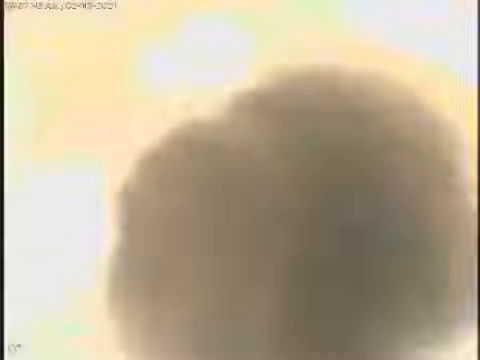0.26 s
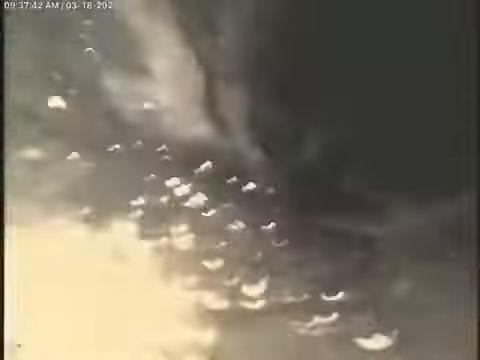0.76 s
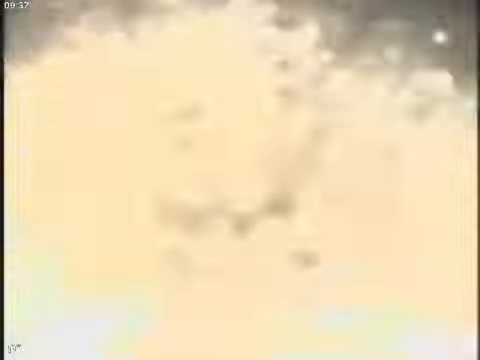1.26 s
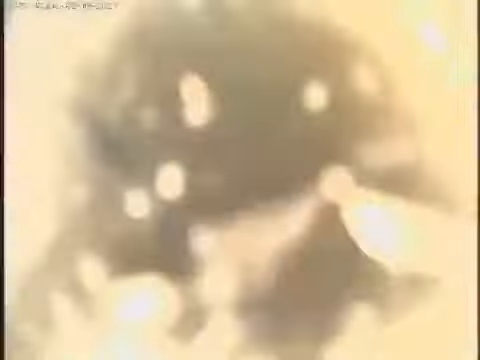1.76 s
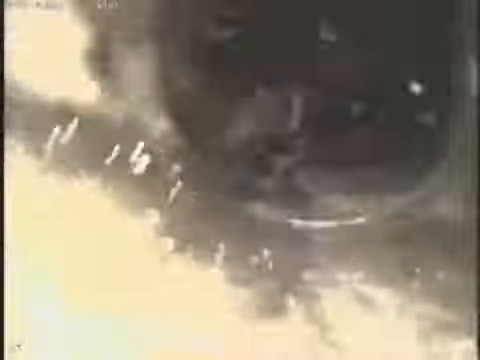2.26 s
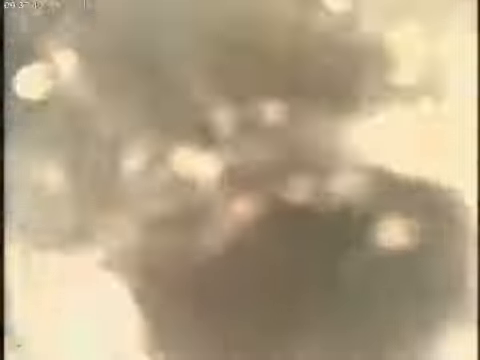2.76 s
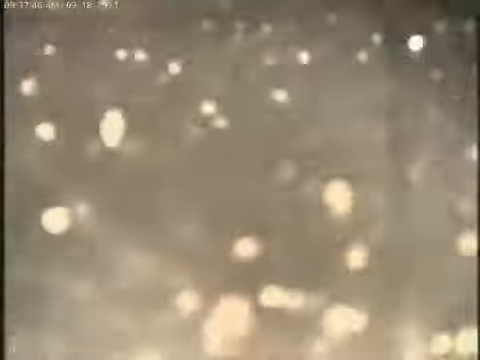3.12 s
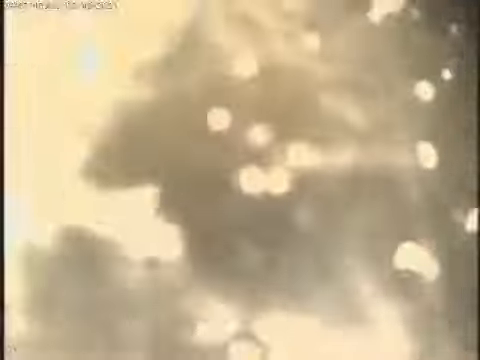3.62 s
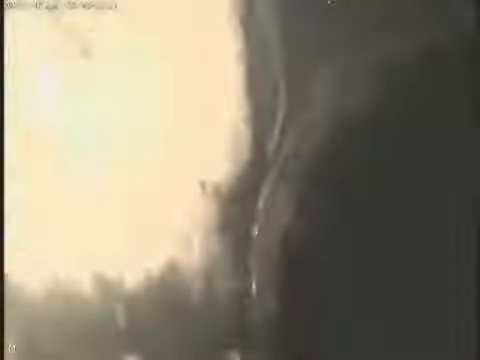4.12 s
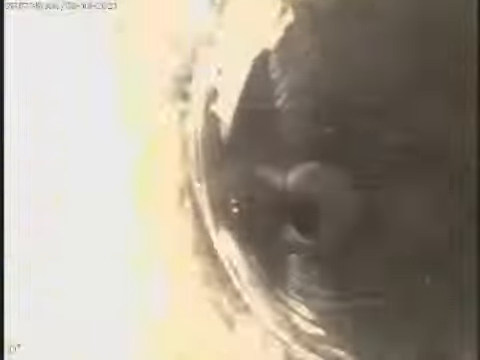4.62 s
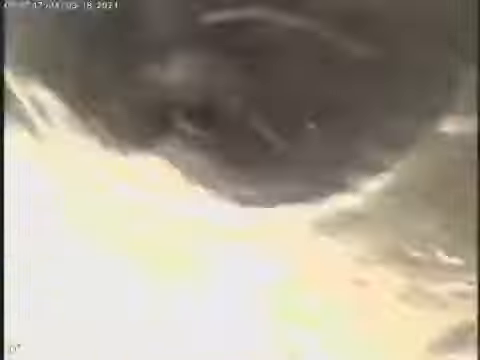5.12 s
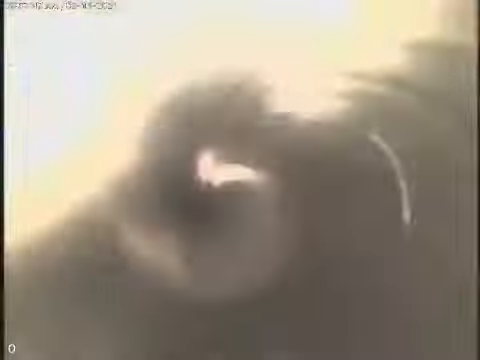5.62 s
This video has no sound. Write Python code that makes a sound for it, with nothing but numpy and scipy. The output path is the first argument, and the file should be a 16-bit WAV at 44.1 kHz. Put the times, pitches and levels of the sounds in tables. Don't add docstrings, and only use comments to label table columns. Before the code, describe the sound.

Outdoors, cable coils scrape and knock at a pipe mouth while a reel drum bumps hollowly, with hard clicks and faint traffic.

```python
import sys
import numpy as np
from scipy import signal
from scipy.io import wavfile

SR = 44100
rng = np.random.default_rng(int(sys.argv[2]) if len(sys.argv) > 2 else 0)


def unload_wav(signal):
    wavfile.write(
        sys.argv[1],
        SR,
        np.round(np.clip(np.atleast_2d(signal).T, -1, 1) * 32767).astype(np.int16),
    )


def convert_level_to_amplitude(level_db):
    exponent = np.asarray(level_db, float) / 20
    return 10 ** exponent


N = 259308

# (time [s], level [dB])
REEL_RUMBLE = [(0.0, -46), (0.3, -39), (0.58, -34.5), (0.71, -37.5), (0.78, -48), (1.43, -49.5),
               (2.0, -45.5), (2.2, -48.5), (2.78, -51.5), (3.05, -37.5), (3.15, -45), (3.3, -33),
               (3.72, -24.5), (3.85, -36), (3.95, -52), (4.72, -73.5), (5.1, -45.5), (5.88, -60.5)]
# (frequency [Hz], level [dB], t60 [s])
FITTING_MODES = [(1646, -0.5, 0.045), (2750, -4.5, 0.059), (4103, -2.5, 0.024), (5560, -16, 0.023)]
SPRING_HZ = 1641
CHANNEL_TOP_HZ = 6830


def rms_one(x):
    return x / np.sqrt(np.mean(x ** 2) + 1e-20)


def peak_one(x):
    return x / abs(x).max()


def band(x, low_hz, high_hz):
    return signal.sosfilt(signal.butter(2, [low_hz, high_hz], "band", fs=SR, output="sos"), x)


def ring(x, hz, t60_s):
    r = convert_level_to_amplitude(-60 / (max(t60_s, 0.002) * SR))
    w = 2 * np.pi * hz / SR
    return signal.lfilter([0, np.sin(w)], [1, -2 * r * np.cos(w), r * r], x + 1e-18)


def resonate(x, hz, width_hz):
    r = np.exp(-np.pi * width_hz / SR)
    zeros = np.array([1, 0, -1]) * (1 - r * r) / 2
    return signal.lfilter(zeros, [1, -2 * r * np.cos(2 * np.pi * hz / SR), r * r], x)


def drift(rate_hz):
    r = np.exp(-80 * np.pi * rate_hz / SR)
    noise = rng.standard_normal(N // 40 + 2002)
    slow = signal.lfilter([1], [1, -2 * r, r * r], noise)[2000:]
    return np.interp(np.arange(N) / 40, np.arange(len(slow)), rms_one(slow))


def grains(per_s, spread_db):
    sizes = convert_level_to_amplitude(spread_db * np.minimum(rng.exponential(1, N), 5))
    signs = rng.choice([-1, 1], N)
    return sizes * signs * (rng.random(N) < per_s / SR)


def in_time(curve):
    s, level_db = np.transpose(curve)
    return np.interp(np.arange(N) / SR, s, level_db)


def arch(start_s, length_s, power):
    phase = np.clip((np.arange(N) / SR - start_s) / length_s, 0, 1)
    return np.abs(np.sin(np.pi * phase)) ** power


def add(track, s, sound):
    i = round(s * SR)
    track[i:i + len(sound)] += sound[:N - i]


def reel():
    # (frequency [Hz], level [dB], t60 [s])
    box_modes = [(176.4, -9.5, 0.12), (206.5, 0, 0.14), (250.6, -4, 0.11), (282, -0.5, 0.089),
                 (329, -11, 0.21), (372, -8, 0.12), (578, -8.5, 0.046), (691, -27.5, 0.025),
                 (1110, -33.5, 0.055)]
    # (time [s], peak [dB], pitch [Hz], decay [s])
    lurches = [(0.186, -21.5, 324, 0.015), (0.346, -14, 232, 0.0054), (0.415, -20, 231, 0.0074),
               (0.449, -15.5, 314, 0.0066), (0.486, -7.5, 216.4, 0.0099), (0.659, -16, 288, 0.01),
               (0.72, -22, 308, 0.013), (1.686, -27.5, 305, 0.022), (1.854, -25.5, 290, 0.0088),
               (1.91, -26, 284, .012), (2.084, -19.5, 248, 0.0062), (1.474, -26.5, 465, 0.0081),
               (2.42, -29.5, 326, 0.017), (2.797, -16, 315, 0.0067), (2.883, -27.5, 268, 0.016),
               (2.904, -20, 307, 0.011), (2.974, -16.5, 322, 0.0096), (2.997, -25, 256, .008),
               (3.030, -10.5, 279, 0.0094), (3.053, -18, 240, 0.0096), (3.078, -14, 302, 0.0076),
               (3.202, -16, 225, 0.0093), (3.233, -15, 202, 0.013), (3.284, -15, 195, 0.012),
               (3.319, -20, 258, .01), (3.341, -17, 189, 0.01), (3.364, -16, 211, 0.025),
               (3.403, -12.5, 209, 0.017), (3.431, -16.5, 202, 0.017), (3.47, -13.5, 202, 0.036),
               (3.511, -7, 274, 0.0093), (3.546, -18, 211, 0.0098), (3.581, -6.5, 229, 0.012),
               (3.631, -5, 215, 0.013), (3.385, -16.5, 318, 0.01), (3.438, -15.5, 333, 0.0074),
               (3.597, -14, 308, 0.0078), (3.66, -20, 260, .01), (3.684, -12, 225, 0.0078),
               (3.704, -8.5, 248, 0.0055), (3.724, -9.5, 201, 0.014), (3.757, -16, 227, .01),
               (3.779, -17, 207, 0.025), (3.823, -19, 213, 0.0092), (3.858, -23, 256, .008),
               (3.88, -25, 350, 0.015), (4.076, -29, 311, 0.014), (5.156, -21.5, 355, 0.011),
               (5.168, -20, 250, 0.0095), (5.281, -31, 348, 0.015),
               (0.289, -31, 260, .006), (0.361, -22, 238, 0.006), (0.522, -18.5, 260, .007),
             (.539, -17.5, 240, 0.0055), (0.574, -20, 250, .007), (.588, -22, 279, .007),
             (.603, -18.5, 297, .006), (.695, -20, 320, 0.0076), (1.475, -32.5, 330, 0.0076),
             (1.64, -29, 420, 0.0055), (1.825, -29.5, 270, .008), (2.045, -30.5, 304, .01),
             (2.14, -31, 258, 0.0072), (5.162, -19.5, 400, 0.0067), (5.184, -26, 380, 0.0061),
             (5.284, -23.5, 404, 0.0043)]
    rumble = np.zeros(N)
    for hz, db, t60_s in box_modes:
        rumble += convert_level_to_amplitude(db + 2.0 * drift(22)) * ring(grains(90, 0.52), hz, t60_s)
    out = convert_level_to_amplitude(in_time(REEL_RUMBLE)) * rms_one(band(rumble, 140, 810))
    t = np.arange(SR // 8) / SR
    for s, peak_db, hz, decay_s in lurches:
        swell = (1 - np.exp(-t / 0.0022)) * np.exp(-t / decay_s)
        tone = np.sin(2 * np.pi * hz * t) + 0.09 * np.sin(2.7 * np.pi * hz * t)
        add(out, s, convert_level_to_amplitude(peak_db - 3.5) * swell * tone)
    return out


def effort():
    # (time [s], length [s], sheath level [dB], wall share [dB], grit share [dB])
    jerks = [(0.145, 0.088, -50, 9.5, -2), (0.338, 0.16, -49, -5, -7), (0.509, 0.18, -52, 5.5, 3.5),
             (0.701, 0.05, -51, 2, -1.5), (0.895, 0.18, -49.5, -3, -5), (2.013, 0.042, -60, 8.5, 1),
             (2.069, 0.23, -53.5, 0, -6), (2.429, 0.5, -59, -10, 17), (2.793, 0.008, -48, 6, 10),
             (2.959, 0.036, -52, 7, -10), (3.017, 0.03, -47, 8, -10), (3.775, 0.18, -45.5, 2, 1),
             (4.058, .006, -39, -3, -7), (4.079, 0.18, -46.5, -7.5, 1.5), (4.938, 0.127, -49.5, -7, -1.5),
             (5.01, 0.12, -43.5, -1.5, -0.5), (5.149, 0.015, -40.5, 7.5, -18),
             (5.277, 0.033, -40, 1.5, -26), (5.337, 0.065, -39, 1, -5), (5.412, 0.2, -37, -1, -4),
             (5.167, 0.021, -49, 4, -9), (0.698, 0.0099, -49, 0, 8), (5.773, 0.11, -47.5, -7.5, -8)]
    # (time [s], length [s], sheath level [dB], wall share [dB], grit share [dB])
    pushes = [(0, 0.23, -59.5, 11.5, -12), (1.01, 0.3, -56, 3.5, -1), (1.276, 0.2, -55, -21, -4),
              (0.24, 0.13, -53, 1, -0.5), (1.475, 0.26, -53, 2.5, -1), (1.579, 0.38, -47.5, -1.5, -3),
              (2.565, 0.24, -50, -12, 8), (4.098, 0.3, -59.5, 10.5, 4), (2.26, 0.29, -62.5, 0, -1),
              (2.887, 0.052, -50.5, 7.5, -15), (3.112, 0.93, -44.5, 3, -1), (3.95, 0.14, -51, -5, -1),
              (4.309, 0.27, -48, -5, -5), (4.445, 0.36, -57, -12, 6), (4.756, 0.13, -56, -21, 3),
              (4.877, 0.076, -61, -16, 5), (5.58, 0.17, -40, -9, -0.5), (2.78, 0.092, -55.5, -10, 11),
              (3.064, 0.29, -61, 9, 7.5), (5.172, 0.13, -67, 7.5, 2), (5.688, 0.089, -59.5, -8, 6)]
    attack_s, sag_db_per_s, release_s = 0.0078, 15, 0.017
    drag_db = np.array([-85.5, -59, -87.5])
    idle_db, drag_follows = -54.5, 0.36
    t = np.arange(N) / SR
    power = convert_level_to_amplitude(drag_db[:, None] + drag_follows * (in_time(REEL_RUMBLE) - idle_db)) ** 2
    for s, length_s, db, wall_db, grit_db in jerks:
        u = np.maximum(t - s, 0)
        release = np.exp(-(np.maximum(u - length_s, 0) / release_s) ** 2)
        shape = (1 - np.exp(-u / attack_s)) * convert_level_to_amplitude(-sag_db_per_s * u) * release
        power += np.outer(convert_level_to_amplitude(db + np.array([0, wall_db, grit_db])), shape) ** 2
    for s, length_s, db, wall_db, grit_db in pushes:
        shape = arch(s, length_s, 1.79)
        power += np.outer(convert_level_to_amplitude(db + np.array([0, wall_db, grit_db])), shape) ** 2
    return np.sqrt(power)


def scrape():
    # (frequency [Hz], width [Hz], level [dB])
    sheath = [(2020, 450, -3), (2670, 530, 5.5), (3600, 900, -3.5), (3425, 140, 4), (3860, 390, 3)]
    # (frequency [Hz], width [Hz], level [dB])
    wall = [(680, 320, 6.5), (696, 53, 6), (940, 72, -15), (1176, 365, 4.5), (1640, 86, -2)]
    # (frequency [Hz], width [Hz], level [dB])
    grit = [(4500, 1300, 3), (5740, 220, 2), (8000, 6900, 2.5)]
    clumps = convert_level_to_amplitude(1.8 * drift(29) + 0.3 * drift(79))
    rubbing = rms_one(grains(5000, 0.72)) + 0.83 * rng.standard_normal(N)
    out = np.zeros(N)
    for body, gain in zip((sheath, wall, grit), effort()):
        voiced = np.zeros(N)
        for k, (hz, width_hz, db) in enumerate(body):
            own_spot = np.roll(rubbing, 977 * k)
            voiced += convert_level_to_amplitude(db + 2.6 * drift(5)) * resonate(own_spot, hz, width_hz)
        out += gain * rms_one(voiced * clumps)
    return out


def knocks():
    # (frequency [Hz], level [dB], t60 [s])
    frame_modes = [(555, -14.5, 0.023), (706, -4, 0.042), (940, -22, 0.033), (1270, 0, 0.0077),
                   (1300, -13, 0.011), (1600, -20.5, 0.0095)]
    # (frequency [Hz], level [dB], t60 [s])
    coil_modes = [(2330, -4, .018), (2620, -6, .014), (3000, -6, .012), (3250, -3, .018), (3670, 0, .014),
                  (4170, -4, .018), (4700, -10, .01), (5500, -10, .01), (6200, -8, .011)]
    # (time [s], peak [dB], ring [Hz], frame share [dB], coil share [dB])
    dry_blows = [(0.026, -29.5, 4000, -4.5, -17), (0.174, -27, 705, 4, -35), (0.338, -25.5, 4250, -9, 2.5),
                 (0.486, -23.5, 577, 2, -28), (0.604, -31, 616, 1, 9), (1.095, -39, 1640, -5, -3),
                 (1.358, -31, 527, -8, -27), (2.021, -36, 640, -12, 8), (2.194, -24.5, 1600, -5, -3.5),
                 (2.791, -15, 4400, -7, -7), (2.936, -25, 1640, -5, -8), (3.073, -21, 1150, 4, -10),
                 (3.501, -23.5, 1020, -16, 2.5), (3.693, -18, 2600, -7, -6), (3.724, -25, 4630, -29, 3.5),
                 (3.788, -25.5, 4870, -12, 4), (3.81, -30, 1190, 7.5, -7), (5.021, -12, 3940, -27, -2.5),
                 (5.285, -21, 850, 13, 8.5), (5.364, -16.5, 660, -30, -21), (5.594, -29, 696, -27, 4),
                 (5.674, -24, 2320, -8, -20), (5.877, -24, 2080, -8.5, -2.5)]
    # (time [s], peak [dB], ring [Hz], frame share [dB], coil share [dB])
    damped_blows = [(0.159, -27, 1240, -3, -12), (0.198, -33, 1323, -18, 5.5), (0.222, -33, 600, -29, 1),
                    (0.656, -26, 736, -9, -6), (0.685, -38, 710, -7, 10), (0.881, -14, 3050, -18, -11.5),
                    (2.42, -27, 1520, -3, -3), (3.076, -27, 580, 5, -44), (3.023, -17.5, 1270, -20, -3.5),
                    (3.028, -13.5, 1430, -4, -20), (4.068, -7, 3950, -15.5, -1.5),
                    (4.223, -36, 1090, 7, -8), (4.254, -27, 644, -2.5, -16), (4.476, -32.5, 716, -5.5, -16),
                    (5.297, -22, 700, -22, -2), (0.438, -26.5, 1360, -11, -16), (4.16, -29, 706, -10, -32),
                    (4.293, -31, 696, -7, -17), (5.336, -16.5, 706, -8, -13), (5.415, -22, 754, -1, 9),
                    (5.507, -19, 670, -15, 0.5), (5.578, -20, 750, -11, -5)]
    # (time [s], peak [dB], ring [Hz], frame share [dB], coil share [dB])
    loose_blows = [(0.373, -24, 3060, -40, -5), (0.72, -25, 1070, -5, -6), (1.474, -20, 700, -10, -17),
                   (2.479, -25, 1220, -28, -30), (2.97, -30.5, 680, 5, -8.5), (3.089, -13, 640, -11, -28),
                   (4.081, -20, 4370, -24, 4), (5.149, -14, 2880, -31, -0.5), (5.156, -37, 686, 14.5, -14),
                   (5.163, -11.5, 692, -3, -20), (5.453, -21, 680, -37, -5), (5.775, -24, 3050, -6, 3.5),
                   (5.813, -25, 2430, -36, -27)]
    out, t = np.zeros(N), np.arange(SR // 7) / SR

    def struck(shove, modes):
        return sum(convert_level_to_amplitude(db + 3 * rng.standard_normal()) * ring(shove, hz, t60_s) for hz, db, t60_s in modes)

    for blows, rattle_db in ((dry_blows, -16), (damped_blows, -8), (loose_blows, 7)):
        for s, peak_db, hz, frame_db, coil_db in blows:
            chatter = np.exp(-t / 0.002) + convert_level_to_amplitude(rattle_db) * np.exp(-t / 0.013)
            shove = rng.standard_normal(len(t)) * chatter + 7.4 * (t == 0)
            low_crack = band(band(shove, 430, 2300), 430, 2300)
            high_crack = band(band(shove, 1500, 9200), 2200, 9800)
            low = peak_one(band(struck(shove, frame_modes), 220, 1900)) + 1.27 * peak_one(low_crack)
            high = peak_one(band(struck(shove, coil_modes), 2400, 8700)) + 1.26 * peak_one(high_crack)
            own = peak_one(band(ring(shove, hz, 0.004 + 11.0 / hz), 0.7 * hz, 1.4 * hz))
            blow = 0.56 * own + convert_level_to_amplitude(frame_db) * low + convert_level_to_amplitude(coil_db) * high
            add(out, s - 0.0004, convert_level_to_amplitude(peak_db - 6.5) * blow)
    return out


def clacks():
    # (frequency [Hz], level [dB], t60 [s]))
    hard_blows = [
        (3.0730, 0.00032, -5, [(570, 2, 0.039), (714, -3, 0.053), (887, -2.5, 0.042), (1180, 2.5, 0.034), (1585, -9.5, 0.038), (2700, -15, 0.039), (3070, -10.5, 0.023), (3860, -19, 0.02), (5680, -18, 0.013)]),
        (4.0675, 0.00077, -5, [(690, -27, 0.076), (2324, -4, 0.028), (3040, -8, 0.027), (3370, -5, 0.026), (3676, 7.5, 0.012), (4100, -13, 0.022), (4690, -14.5, .03), (4940, -17, 0.034), (5760, -13, .03), (6250, -3, 0.02)]),
        (5.1484, 0.0003, -15.5, [(2580, 3.5, 0.036), (3370, -9, .025), (3960, 0, 0.028), (6420, 3, 0.016)]),
        (5.2824, 0.0012, -10.5, [(675, 8.5, 0.026), (1073, 1, 0.017), (1310, -5, .02), (2200, -8, 0.018), (2620, -5, 0.041), (3050, -7, .02), (3540, -1.5, 0.037), (3840, -1.5, 0.024), (5600, -29, 0.018)]),
        (.1585, 0.00055, -18.5, [(540, -2.5, 0.023), (705, -3, .035), (960, -5, 0.023), (1200, 1.5, 0.019), (1520, -11, .025)]),
    ]
    out, t = np.zeros(N), np.arange(SR // 8) / SR
    for s, rise_s, peak_db, modes in hard_blows:
        sound = np.zeros(len(t))
        for k, (hz, db, t60_s) in enumerate(modes):
            sound += ring(convert_level_to_amplitude(db) * (-1) ** k * (t == 0), hz, t60_s)
        splinter = np.exp(-t / 0.00064) + convert_level_to_amplitude(-17.5) * np.exp(-t / 0.015)
        crack = band(rng.standard_normal(len(t)) * splinter, 2000, 4800)
        rise = 1 - np.exp(-(t / rise_s) ** 2)
        blow = peak_one(sound * rise) + convert_level_to_amplitude(-11.5) * peak_one(crack * np.sqrt(rise))
        add(out, s, convert_level_to_amplitude(peak_db) * blow)
    return out


def slips():
    # (time [s], peak [dB], ring [Hz])
    slip_events = [(.107, -41, 3500), (.2, -27.5, 5930), (0.22, -31, 5030), (3.047, -32.5, 2700),
                   (3.617, -28.5, 1900), (3.9, -29, 2500), (5.033, -28, 3000), (5.04, -31, 4500),
                   (5.293, -23, 3300), (5.302, -26, 2200), (.373, -24.5, 3000), (.175, -29, 1300),
                   (.236, -34, 2300), (5.776, -30, 6500), (5.81, -45, 1110), (5.358, -33, 1000),
                   (5.368, -25, 2570), (5.38, -33, 744), (5.398, -29, 686), (5.405, -24, 740),
                   (5.436, -32, 720), (5.456, -26, 3300), (5.491, -33, 2700), (5.511, -24, 2700),
                   (5.53, -33, 3620), (5.578, -26, 2600), (5.594, -25, 2700), (5.681, -28, 4000),
                   (5.812, -32.5, 2400), (5.838, -36, 2380), (.724, -25, 5100), (.727, -33, 6200),
                   (.613, -28.5, 5000), (.754, -38, 5440), (5.445, -30, 720), (5.465, -31, 690),
                   (4.195, -39, 1100), (4.262, -37, 1300), (4.294, -44, 1200)]
    out, t = np.zeros(N), np.arange(SR // 20) / SR
    for s, peak_db, hz in slip_events:
        friction = rng.standard_normal(len(t)) * np.exp(-t / 0.002)
        add(out, s, convert_level_to_amplitude(peak_db) * peak_one(ring(friction, hz, 6.9 / hz)))
    return out


def spring_twangs():
    # (time [s], peak [dB])
    twangs = [(1.0951, -58), (2.9373, -32), (3.897, -38), (4.9667, -56), (5.002, -59), (5.03, -40),
              (4.978, -38.5), (4.992, -36), (5.07, -32), (5.115, -38.5), (5.136, -37.5), (5.225, -48),
              (5.251, -58), (1.13, -46), (1.167, -53), (1.7, -45), (1.753, -44), (2.221, -51), (3.412, -38),
              (3.581, -39)]
    out, t = np.zeros(N), np.arange(SR // 7) / SR
    for s, peak_db in twangs:
        shake = rng.standard_normal(len(t)) * np.exp(-t / 0.0031)
        hz = SPRING_HZ + 12 * rng.standard_normal()
        add(out, s, convert_level_to_amplitude(peak_db) * peak_one(ring(shake, hz, 0.071)))
    return out


def spring_singing():
    note = rms_one(ring(rng.standard_normal(N), SPRING_HZ, 0.09))
    return convert_level_to_amplitude(-64) * arch(4.95, 0.36, 0.5) * note


def fitting_clinks():
    # (time [s], peak [dB], share of the two low modes [dB])
    clinks = [
        (0.025, -39, -3.5),
        (0.3369, -24.5, -9),
        (1.0948, -41.5, 1.5),
        (2.7905, -26, -16),
        (2.936, -36.5, 0.5),
    ]
    out, click = np.zeros(N), 1.0 * (np.arange(SR // 10) == 0)
    for s, peak_db, low_db in clinks:
        for hz, db, t60_s in FITTING_MODES:
            gain = convert_level_to_amplitude(peak_db + db + low_db * (hz < 3000))
            add(out, s, gain * ring(click, hz, t60_s))
    return out


def fitting_sliding():
    # (time [s], length [s], level [dB], lowest mode share [dB], highest mode share [dB])
    slides = [
        (1.087, 0.13, -61, 3, 1),
        (1.56, 0.25, -58, -3.5, 4.5),
        (2.076, 0.19, -59, -7, -4),
        (3.989, 0.08, -57, 0, 4),
        (5.2, 0.09, -70, 9, -5),
    ]
    rung = [rms_one(ring(rng.standard_normal(N), hz, 0.47 * t60_s)) for hz, _, t60_s in FITTING_MODES]
    out = np.zeros(N)
    for s, length_s, db, low_db, high_db in slides:
        tone = convert_level_to_amplitude(low_db) * rung[0] + rung[1] + rung[2] + convert_level_to_amplitude(high_db - 4) * rung[3]
        out += convert_level_to_amplitude(db) * arch(s, length_s, 0.5) * tone
    return out


def traffic():
    # (frequency [Hz], level per Hz [dB])
    spectrum = [(13, -31), (22, 8.5), (98, 9), (305, -7), (505, -15.5), (799, -32), (1290, -12.5),
                (1650, -23), (2540, -46), (3080, -27), (3650, -29.5), (6510, -36.5), (7000, -36),
                (9100, -66), (15400, -120)]
    table_hz, table_db = np.transpose(spectrum)
    edges_hz = 20 * 2 ** np.arange(0, 8.6, 0.5)
    white = rng.standard_normal((2, N + SR))
    out = np.zeros(N)
    for k, (low_hz, high_hz) in enumerate(zip(edges_hz, edges_hz[1:])):
        level_db = np.interp(np.log(low_hz * high_hz) / 2, np.log(table_hz), table_db)
        out += convert_level_to_amplitude(level_db + 1.9 * drift(3.7)) * band(white[k % 2], low_hz, high_hz)[SR:]
    return convert_level_to_amplitude(-45) * rms_one(out)


def motor_hum():
    # (time [s], level [dB])
    hum_level = [(0, -62), (2, -62), (4.2, -60), (4.35, -56), (5.0, -56), (5.2, -60), (5.88, -60)]
    # (multiple [1], level [dB])
    orders = [(1, 0), (2, 1), (3, -10)]
    turn = 2 * np.pi * np.cumsum(141 + 0.5 * drift(7.2)) / SR
    return convert_level_to_amplitude(in_time(hum_level)) * sum(convert_level_to_amplitude(db) * np.sin(k * turn) for k, db in orders)


def scene():
    near = reel() + scrape() + knocks() + clacks() + slips() + spring_twangs() + fitting_clinks()
    dull = signal.lfilter([0.4], [1, -0.6], near)
    for lag_s, echo_db in ((0.0037, -27), (0.0165, -24.5)):
        add(near, lag_s, convert_level_to_amplitude(echo_db) * dull)
    return (near + spring_singing() + fitting_sliding() + traffic() + motor_hum())[None]


def gapped_treble(x):
    gaps, gap_from_hz, gap_db, wander_hz = 80, 1800, -35, 90
    hz, s, z = signal.stft(x, SR, nperseg=1024)
    keep = np.ones(z.shape[1:])
    for at, pitch, length, width in rng.random((gaps, 4)):
        centre_hz = gap_from_hz + pitch ** 0.7 * (CHANNEL_TOP_HZ - gap_from_hz)
        rows = abs(hz - centre_hz) < 70 + 70 * width ** 3
        columns = abs(s - at * s[-1]) < 0.025 + 0.08 * length ** 2
        keep[np.ix_(rows, columns)] = convert_level_to_amplitude(gap_db)
    treble = abs(z[0, hz > gap_from_hz]).mean(axis=0)
    keep[:, treble > 2.5 * np.median(treble)] = 1
    frame_at = np.minimum((s * SR).astype(int), N - 1)
    edge_hz = CHANNEL_TOP_HZ + 60 + wander_hz * drift(3.0)[frame_at]
    keep *= convert_level_to_amplitude(-np.clip((hz[:, None] - edge_hz) / 3, 0, 60))
    return signal.istft(z * keep, SR, nperseg=1024)[1][:, :N]


def low_pass(x):
    return signal.sosfilt(signal.butter(12, 8010, fs=SR, output="sos"), x)


def record(dry):
    steep = signal.cheby2(16, 40, CHANNEL_TOP_HZ * 1.109, fs=SR, output="sos")
    cut = signal.sosfilt(steep, dry)
    cut = signal.sosfilt(signal.butter(4, 7400, fs=SR, output="sos"), cut)
    cut = signal.sosfilt(signal.butter(2, 38, "high", fs=SR, output="sos"), cut)
    hiss = convert_level_to_amplitude(-89) * rng.standard_normal(dry.shape)
    mix = gapped_treble(cut + hiss)
    return low_pass(mix)


dry = scene()
out = record(dry)
unload_wav(out)
```